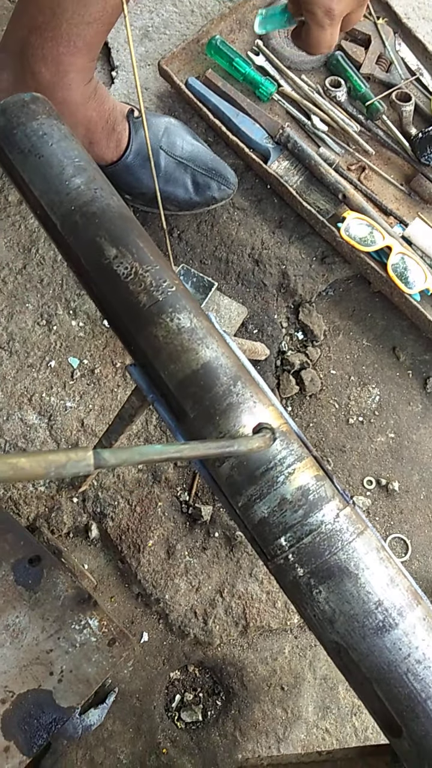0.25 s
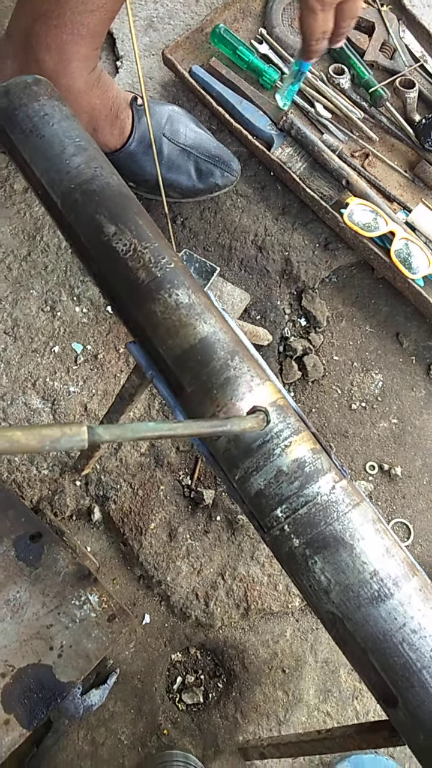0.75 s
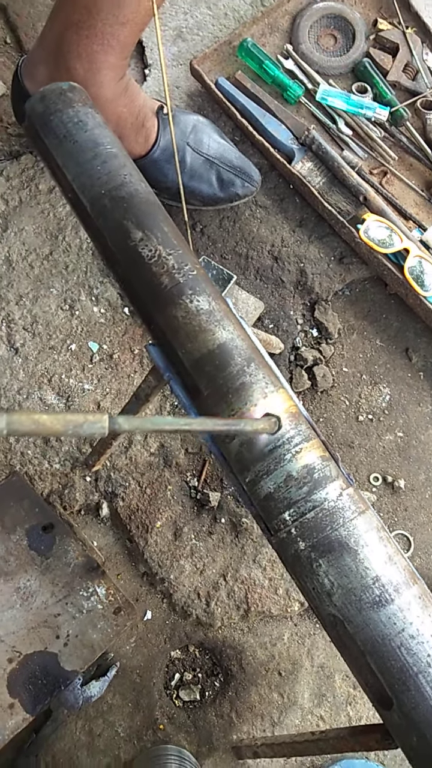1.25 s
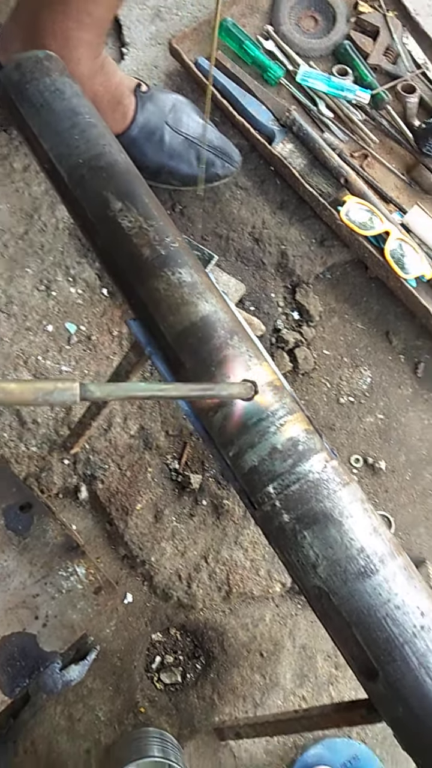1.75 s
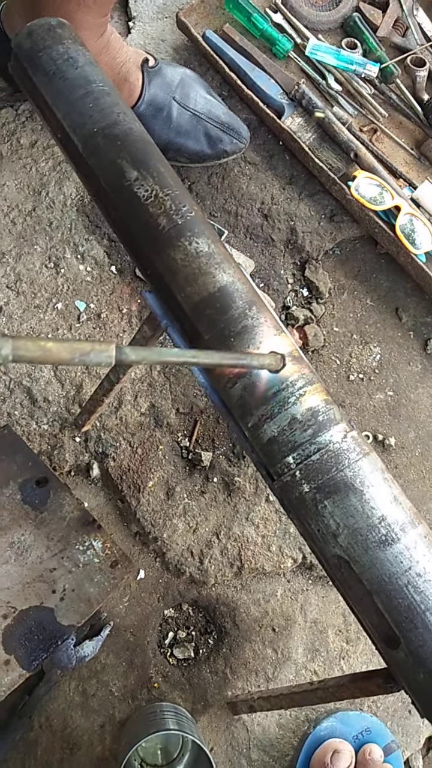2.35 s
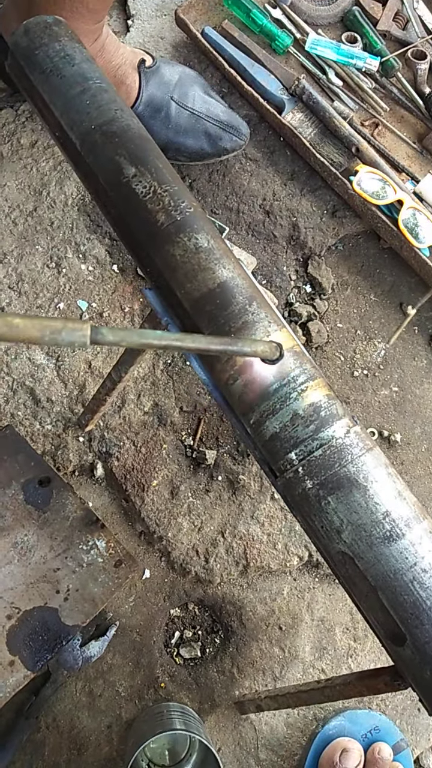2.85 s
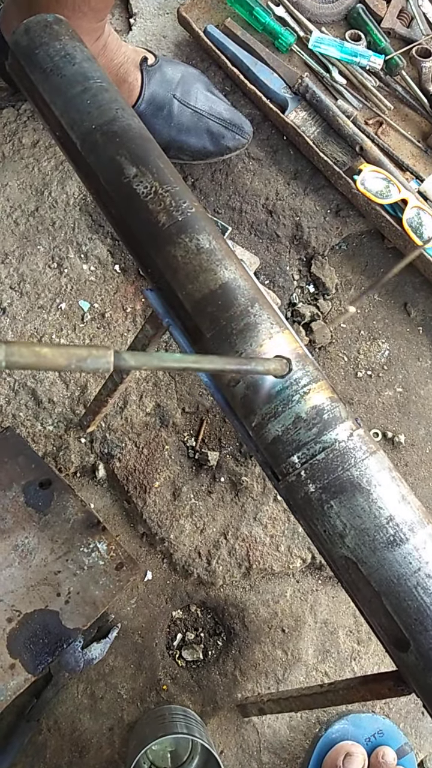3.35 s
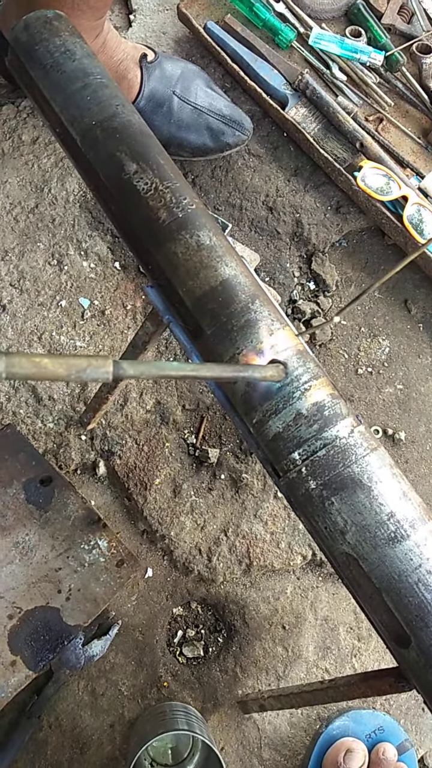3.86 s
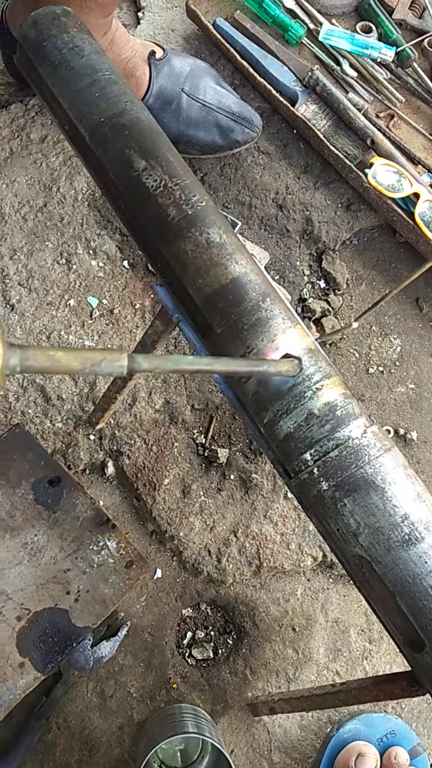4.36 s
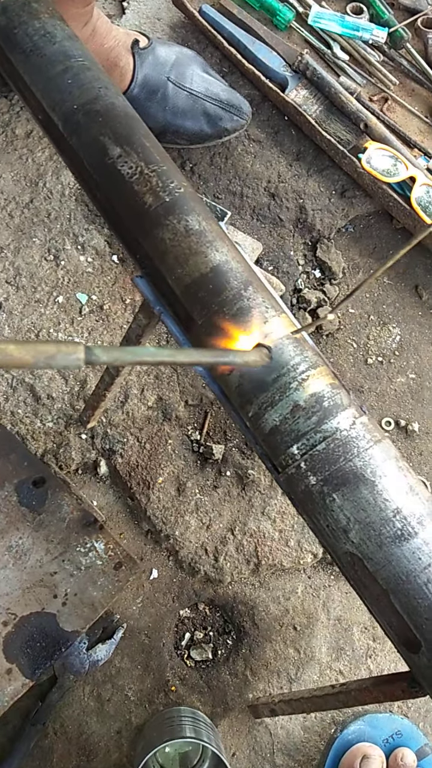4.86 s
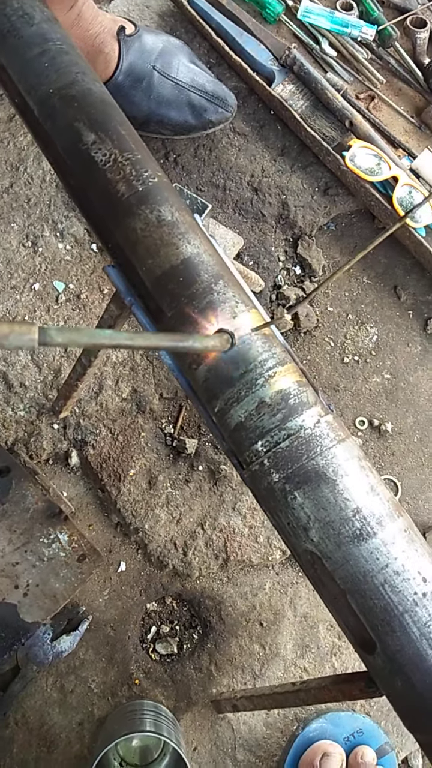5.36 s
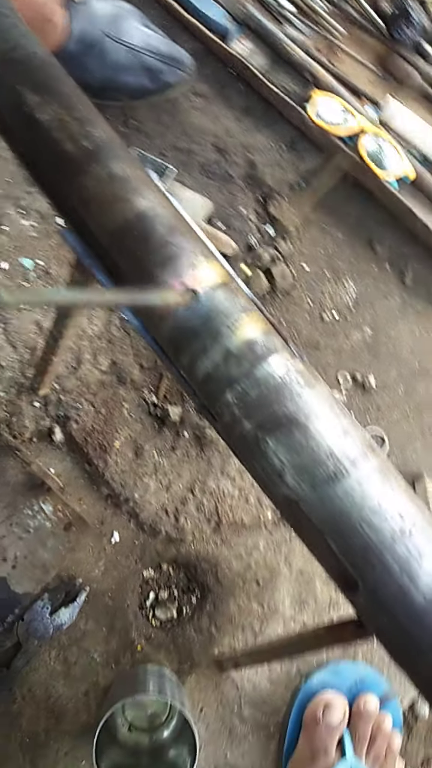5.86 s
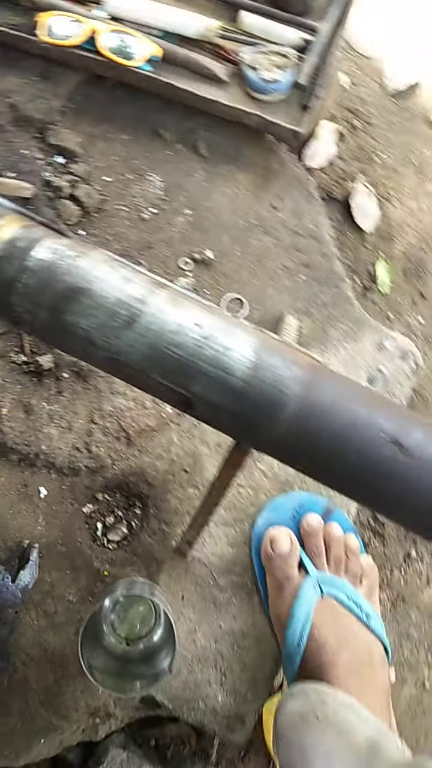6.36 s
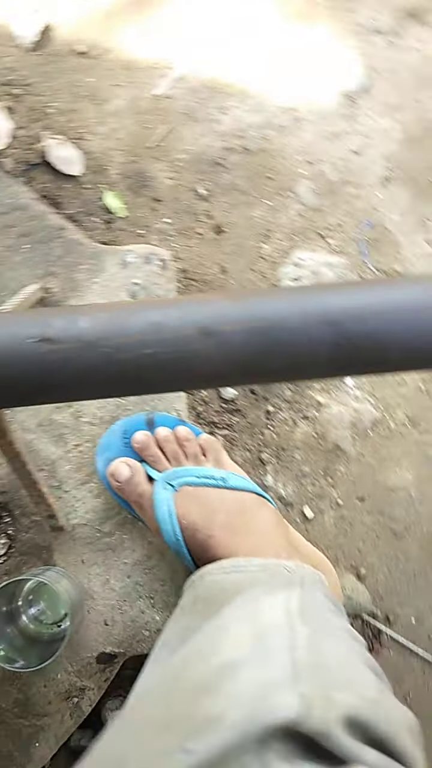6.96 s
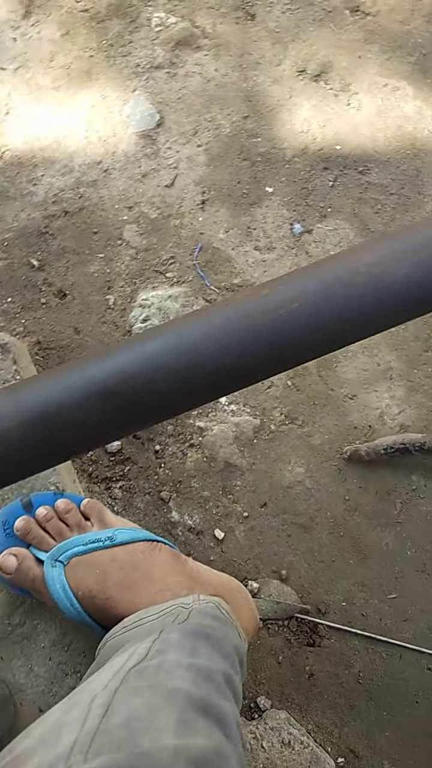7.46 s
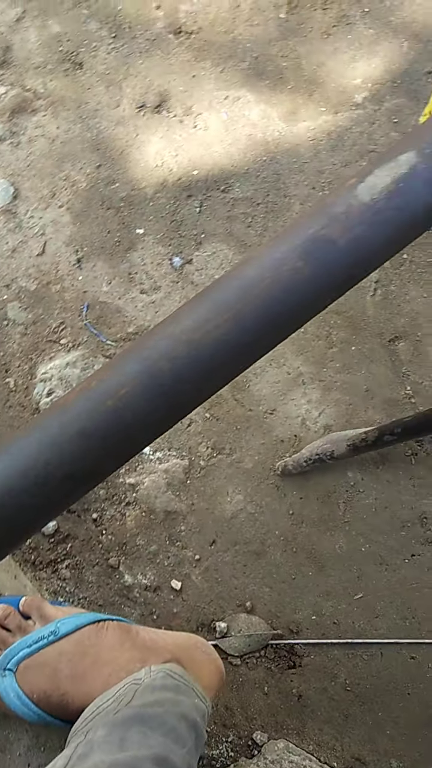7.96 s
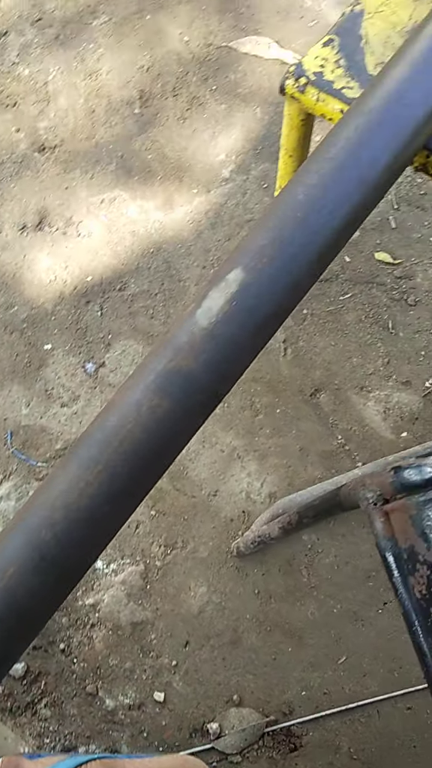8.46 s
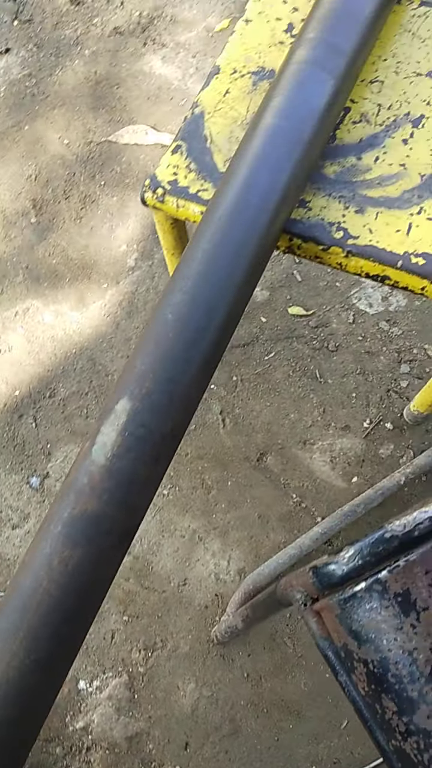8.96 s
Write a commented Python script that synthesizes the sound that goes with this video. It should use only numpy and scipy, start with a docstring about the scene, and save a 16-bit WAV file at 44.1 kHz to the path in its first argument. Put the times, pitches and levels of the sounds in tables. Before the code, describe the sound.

Close, bright welding flame hiss over a low hum, broken by brief crackling pops, then changing colour as the listener turns away.

```python
"""A gas welding torch plays on a steel pipe, about an arm's length from a phone that later turns away.
Turbulent combustion makes the flame rumble, hum and at first flutter in puffs; it roars on the steel.
The jet is shaped noise: a nozzle hiss, a fine sizzle and a thin whistle. Molten metal spits in short pulses,
tools knock and tick, and faint tones pass behind.
Delayed copies off pipe, ground and tools comb the treble and slide as torch and phone move."""
import sys
import numpy as np
from scipy import signal
from scipy.fft import rfft, irfft, next_fast_len
from scipy.io import wavfile
from scipy.ndimage import uniform_filter1d

SR = 44100
rng = np.random.default_rng(int(sys.argv[2]) if len(sys.argv) > 2 else 0)


def waveform_to_disk(signal):
    """Save audio, clipped to [-1, 1], as 16-bit WAV at the path in sys.argv[1]."""
    frames = np.transpose(np.atleast_2d(signal))
    scaled = np.clip(frames, -1, 1) * 32767
    samples = np.round(scaled).astype(np.int16)
    wavfile.write(sys.argv[1], SR, samples)


N = 406161
T = np.arange(N) / SR  # time, s

# Levels in the tables are nominal: the functions add small offsets and chance.
# flame as torch and phone move: t/s, rumble level/dB, roar on steel level/dB, rush round pipe level/dB
FLAME_LEVELS = [(0.0, -24, -34.5, -27.5), (0.23, -30, -31, -27.0), (0.49, -30, -31.5, -28.5),
                (0.86, -30.5, -32.5, -27.5), (1.57, -33, -31.5, -29.0), (1.78, -34, -31, -27),
                (2.5, -34.5, -35, -29.5), (2.78, -37.5, -32.5, -28.5), (3.44, -33, -33.5, -29.0),
                (3.67, -39, -39.5, -38), (4.4, -39.5, -40, -36.5), (4.77, -42.0, -43.5, -41),
                (5.6, -45.5, -44.0, -39), (6.35, -42.5, -43, -38), (6.91, -36.5, -33.0, -30.5),
                (7.48, -34.5, -32.5, -36), (8.1, -32.5, -31.5, -36.0), (8.43, -37.5, -34.5, -37.5),
                (8.9, -37, -30.0, -31.5), (9.21, -41, -32.5, -32.5)]
# gas jet: t/s, nozzle hiss level/dB, fine sizzle level/dB
JET_LEVELS = [(0, -32, -43), (.51, -37, -40.5), (.68, -33, -38), (1.12, -33, -31), (1.36, -30, -38.5),
              (1.58, -41.5, -37), (1.79, -32, -43), (1.95, -37.5, -42.5), (2.44, -35, -39.5),
              (2.85, -37.5, -42.5), (3.05, -34.5, -41.5), (3.51, -37, -43.5), (4.28, -36.5, -43.5),
              (4.6, -36.5, -42), (5.67, -40, -44.5), (6.32, -36, -47), (6.89, -37.5, -45.5),
              (7.28, -33.5, -39), (8.23, -33, -38.5), (8.52, -35.5, -39.5), (8.98, -28, -35.5),
              (9.21, -31.5, -40)]
# relative noise spectra of flame and jet: f/Hz, level/dB per Hz
RUMBLE_SPECTRUM = [(13, -55), (22, -27), (38, -21.5), (99, 0.5), (124, -1.5), (185, -4), (237, -3),
                   (275, -7.5), (335, -8.5), (375, -20), (430, -17.5), (560, -31), (950, -120)]
ROAR_SPECTRUM = [(220, -34), (380, -9), (503, -3.5), (734, 1), (860, -2.5), (1100, -2), (1500, -0.5),
                 (1620, -3.5), (1910, -1.5), (2070, -4), (2360, -2), (2580, -6.5), (3100, -5), (4030, -25),
                 (6820, -120)]
RUSH_SPECTRUM = [(1530, -19), (2600, -6), (3380, 0.5), (4700, -1.5), (5390, -14), (5700, -11.5),
                 (7410, -17), (12500, -120)]
HISS_SPECTRUM = [(3120, -13.5), (5300, -3.5), (7120, 0), (7610, -2.5), (8810, -9.5), (9400, -14.5),
                 (12200, -41), (20700, -120)]
SIZZLE_SPECTRUM = [(5240, -20), (8900, -13), (9710, -6.5), (10900, -3), (13500, -2.5), (14600, 0.5)]
# echo paths: t/s, lag off the ground/ms, lag off the pipe/ms, turn away from the work (0-1)
ECHO_PATHS = [(0, 2.1, 0.32, 0.2), (.8, 1.97, 0.28, 0), (1.6, 2.03, 0.28, 0), (2.1, 1.96, 0.28, 0.14),
              (3.2, 2.27, .27, 0), (3.8, 1.95, 0.26, 0.23), (4.4, 2.1, 0.27, 0.06), (5.3, 2.11, 0.21, 0),
              (5.9, 2.24, 0.22, 0.45), (6.5, 1.82, 0.295, 0.8), (7.2, 1.44, 0.3, 1), (8.2, 1.53, 0.36, 1),
              (8.8, 1.01, 0.34, 0.8), (9.21, 0.96, 0.34, 0.63)]
# hollows that ring with the flame as the phone turns: f/Hz, width/Hz, level/dB re roar
HOLLOW_MODES = [(167, 28, -12), (234, 31, -4), (336, 60, -8.5), (728, 57, -14.5), (883, 58, -11),
                (1720, 42, -11.5), (2575, 60, -18)]
# low hum of the flame: f/Hz, width/Hz, level/dB re rumble
HUM_MODES = [(114.4, 9.6, -8), (135.7, 1.8, -6.5), (272.5, 5.1, -18.5)]
# partials of a puff: multiple of its pitch, rise time/s, level/dB
PUFF_PARTIALS = [(1, 0.012, 0.5), (2.2, .007, -4.5), (1.65, 0.007, -28)]
# loud spits of the melt: t/s, peak level/dB
LOUD_POPS = [(3.9727, -11), (3.9878, -11), (3.9936, -5), (4.0576, -10), (4.0669, -9.5), (4.5011, -15),
             (4.9385, -8), (4.9422, -3.5), (4.9566, -2), (4.96, -6), (4.9662, -4), (4.9795, -5),
             (4.9809, -6), (4.9988, -9), (5.0024, -12), (5.0064, -11), (5.4363, -12), (5.4375, -13),
             (5.4548, -12)]
# small knocks and ticks of tools: t/s, peak level/dB, f/Hz, decay time/s
TOOL_TICKS = [(.727, -13, 3830, 0.0083), (.727, -18, 1080, 0.0087), (.731, -16, 2300, .01),
              (.83, -24, 2000, .012), (6.902, -24, 2970, 0.0043), (6.923, -18, 3180, 0.0079),
              (7.045, -18, 3530, 0.0066), (7.045, -27, 12000, .005), (7.985, -23, 2000, .004),
              (8.090, -18, 2600, 0.011)]
# bright bands: t/s, lower f/Hz (in the rush), upper f/Hz (in the hiss), prominence level/dB
BRIGHT_BANDS = [(0, 3150, 7260, -1.5), (.7, 3300, 7240, -4.5), (1.3, 3350, 7060, -5), (2.2, 3350, 6780, -7),
                (3.5, 3400, 6730, -13), (4.2, 3700, 7400, -16), (5.3, 3800, 7620, -5.5),
                (6.0, 3450, 7420, -10), (6.25, 3350, 6900, -1.5), (6.6, 3200, 6650, -3),
                (7.0, 3200, 7290, -0.5), (7.6, 3100, 7280, -5), (8.2, 3200, 7610, -5.5),
                (9.21, 3300, 7570, -5)]
# faint passing tones: start t/s, end t/s, f/Hz, rms level/dB
PASSING_TONES = [(4.15, 4.8, 378, -53.5), (5.5, 6.9, 494.5, -57), (5.7, 8.3, 240.1, -50),
                 (6.597, 7.8, 740, -46.5), (7.95, 9.2, 849, -43)]
# thin whistle of the tip: f/Hz, width/Hz, level/dB re the mean of hiss and sizzle
WHISTLE_MODES = [(14800, 500, -9), (15260, 200, -4.5)]
# the flame lifts off the steel: t/s, half length/s, drop of roar level/dB
FLAME_LIFTS = [(1.15, .12, 4.5), (1.53, .06, 1.5), (2.36, 0.072, 3.5), (3.11, 0.062, 5), (3.81, 0.071, 3.5),
               (4.17, 0.17, 4.5), (4.7, .07, 1), (5.09, 0.074, 5), (5.54, .05, 4.3), (6.05, .05, 3.5)]
# the tip dips close to the melt: t/s, half length/s, rise of sizzle level/dB
TIP_DABS = [(1.03, 0.067, 2), (2.07, 0.059, 7.5), (2.25, .045, 10.5), (2.43, 0.095, 9.5), (2.62, 0.065, 6),
            (3.43, 0.054, 9.5), (3.59, 0.12, 8), (4.0, 0.097, 11), (4.47, 0.046, 4.5), (4.96, 0.06, 7),
            (5.24, .05, 0.5), (5.45, 0.064, 6), (5.9, .07, 3.5), (6.66, 0.13, 5.5), (7.86, 0.046, 1)]
# the treble dips briefly: t/s, half length/s, drop of hiss level/dB, drop of sizzle level/dB
TREBLE_DIPS = [(6.13, 0.076, 2.5, 0), (6.495, .03, 6, 0), (6.984, 0.035, 1.5, 8), (7.483, 0.028, 3, 5),
               (7.734, .04, 2, 5)]
# runs of flutter: first puff t/s, last puff t/s, first peak level/dB, last peak level/dB, f/Hz
FLUTTER_RUNS = [(.026, 0.242, -20, -16, 132.4), (.2875, 0.459, -20.5, -20.5, 132),
                (.556, 0.903, -24.5, -24.5, 134.4), (1.725, 1.77, -30, -28, 132),
                (1.983, 2.025, -24, -27, 117), (2.135, 2.175, -25, -23.5, 116)]
# bursts of weaker crackle: start t/s, end t/s, typical peak level/dB
CRACKLE_BURSTS = [(3.957, 4.002, -23), (4.059, 4.1, -23.5), (4.468, 4.51, -27), (4.944, 4.97, -12),
                  (4.976, 4.985, -16), (4.996, 5.003, -17), (5.422, 5.467, -21)]
# scattered paths shorten as the phone swings away: t/s, share of first length
PATH_SHRINK = [(5.9, 1), (6.4, 0.83), (7.4, 0.76), (9.21, .6)]
# a second bright band glides up through the hiss as the phone turns: t/s, f/Hz, prominence level/dB
GLIDING_BAND = [(7.3, 5450, -30), (7.8, 5650, -11), (8.3, 5970, -5), (8.7, 6450, -8), (9.21, 7020, -14)]

LIFT_RUMBLE, LIFT_RUSH, LIFT_HISS, LIFT_SIZZLE = 0.23, 1.0, .8, 0.72  # dB lost per dB of roar
DAB_HISS = 0.59  # dB of hiss per dB of sizzle
PUFF_PERIOD_S, PUFF_SCATTER_DB = .0435, 0.3
CRACKLE_GAP_S, CRACKLE_SCATTER_DB = .004, 2
TONE_FADE_S, TONE_WAVER = 0.16, .008  # waver as a share of the pitch
TOP_HZ = 15600


def undb(db):
    """Amplitude ratio from its logarithmic level in decibels."""
    return 10 ** (np.asarray(db) / 20)


def unit(x):
    """Normalisation to unit root-mean-square amplitude."""
    return x / np.sqrt(np.mean(x ** 2))


def curves(table):
    """Linear interpolation in time of each table column."""
    s, *columns = np.transpose(table)
    return [np.interp(T, s, c) for c in columns]


def swells(rows):
    """Superposition of Gaussian bells (s, half length s, height)."""
    return sum(height * np.exp(-((T - s) / half) ** 2) for s, half, height in rows)


def walk(rate):
    """Slow random modulation: levels held 1 / rate s and slewed, rms 1."""
    k = max(int(SR / rate), 1)
    levels = rng.standard_normal(N // k + 1)
    return unit(uniform_filter1d(np.repeat(levels, k), k)[:N])


def noise(gain_at):
    """Spectral shaping of white noise by a gain of frequency, rms 1."""
    size = next_fast_len(N, True)
    hz = np.maximum(np.fft.rfftfreq(size, 1 / SR), 1)
    return unit(irfft(rfft(rng.standard_normal(size)) * gain_at(hz), size)[:N])


def turbulence(colour):
    """Broadband turbulence noise, its spectrum interpolated on log frequency."""
    points, db = np.transpose(sorted(map(tuple, colour)))
    return noise(lambda hz: undb(np.interp(np.log(hz), np.log(points), db, left=-90, right=-90)))


def resonances(modes):
    """Resonance under random excitation: noise peaks (Hz, width Hz, dB), summed."""
    def peak(centre, width):
        return noise(lambda hz: 1 / (1 + ((hz - centre) / width) ** 2))
    return sum(undb(db) * peak(centre, width) for centre, width, db in modes)


def band(hz, width):
    """Amplitude and phase modulation: low noise moved onto a gliding carrier."""
    envelope = noise(lambda f: 1 / (1 + (f / width) ** 2) * (f < 4 * width))
    phase = 2 * np.pi * np.cumsum(hz) / SR + 2 * walk(width)
    return np.sqrt(2) * envelope * np.cos(phase)


def butter(x, hz, kind, order=2):
    """Causal Butterworth filtering, low-, high- or band-pass."""
    return signal.sosfilt(signal.butter(order, np.minimum(hz, .45 * SR), kind, fs=SR, output="sos"), x)


def delayed(x, lag_ms):
    """Propagation delay along a path of changing length."""
    fine = signal.resample_poly(x, 2, 1)
    return np.interp(T - lag_ms / 10 ** 3, np.arange(2 * N) / (2 * SR), fine)


def add(track, s, sound):
    """Linear superposition of a sound at a given time."""
    i = max(int(s * SR), 0)
    track[i:i + len(sound)] += sound[:N - i]


def flame():
    """Combustion noise: gas rumbles and hums; shared eddies shake the roar on the steel and the rush round it."""
    rumble_db, roar_db, rush_db = curves(FLAME_LEVELS)
    lift_db = swells(FLAME_LIFTS)
    rumble_db = rumble_db - LIFT_RUMBLE * lift_db
    roar_db = roar_db - lift_db
    rush_db = rush_db - LIFT_RUSH * lift_db
    turn = curves(ECHO_PATHS)[2]
    bright_hz, _, bright_db = curves(BRIGHT_BANDS)
    eddies = walk(60)
    # while the flame flutters, the puffs carry most of its low sound
    rumble_db = rumble_db - np.interp(T, [.45, .6, 1.1], [5, 1.8, 0])
    rumble = turbulence(RUMBLE_SPECTRUM) + (1 - 0.76 * turn) * resonances(HUM_MODES)
    low = rumble * undb(rumble_db - 1.1 + 1.0 * turn + 1.2 * walk(18))
    low = low + turn * undb(roar_db - 1.0) * resonances(HOLLOW_MODES)
    roar_db = roar_db + 0.12 - 1.3 * turn + 0.76 * eddies + 0.97 * walk(300)
    roar = turbulence(ROAR_SPECTRUM) * undb(roar_db)
    rush = turbulence(RUSH_SPECTRUM) + undb(bright_db - 3.5) * band(bright_hz, 200)
    rush = rush / np.sqrt(1 + undb(2 * bright_db - 1.5))
    return low, roar + rush * undb(rush_db - 0.06 + 0.46 * eddies + 0.9 * walk(18))


def jet():
    """Jet noise: the nozzle hisses and whistles; the sizzle flickers as the tip wavers over the melt."""
    hiss_db, sizzle_db = curves(JET_LEVELS)
    lift_db, dab_db, waver = swells(FLAME_LIFTS), swells(TIP_DABS), walk(14)
    hiss_dip_db = swells((s, half, db) for s, half, db, _ in TREBLE_DIPS)
    sizzle_dip_db = swells((s, half, db) for s, half, _, db in TREBLE_DIPS)
    hiss_db = hiss_db - LIFT_HISS * lift_db + DAB_HISS * dab_db + 0.95 * waver - hiss_dip_db
    sizzle_db = sizzle_db - LIFT_SIZZLE * lift_db + dab_db + 1.2 * waver - sizzle_dip_db
    _, bright_hz, bright_db = curves(BRIGHT_BANDS)
    glide_hz, glide_db = curves(GLIDING_BAND)
    hiss = turbulence(HISS_SPECTRUM) + undb(bright_db) * band(bright_hz, 280)
    hiss = hiss + undb(glide_db) * band(glide_hz, 170)
    # the bands change the colour, not the power
    hiss = hiss / np.sqrt(1 + undb(2 * bright_db) + undb(2 * glide_db))
    hiss = hiss * undb(hiss_db + 0.16 + 0.57 * walk(35))
    sizzle = turbulence(SIZZLE_SPECTRUM) * undb(sizzle_db - 0.4 + 1.24 * walk(35) + 0.78 * walk(150))
    whistle = resonances(WHISTLE_MODES) * undb((hiss_db + sizzle_db) / 2 + 2 * walk(25))
    return hiss + sizzle + whistle


def scatter(x, count=6):
    """Scattering of short waves by tools and legs: weak echoes whose paths shorten as the phone swings away."""
    turn = curves(ECHO_PATHS)[2]
    share = .15 + .1 * turn
    shrink, = curves(PATH_SHRINK)
    echoes = np.zeros(N)
    for k, lag_ms in enumerate(np.geomspace(.62, 3.1, count)):
        echoes += (-1) ** k * delayed(x, lag_ms * shrink + 0.038 * walk(4.4))
    return (x + share * echoes) / np.sqrt(1 + count * share ** 2)


def reflections(x, ground=0.12, pipe=0.13, turned=0.013):
    """Comb interference: two short echoes grow as the phone turns and tremble with the hand."""
    ground_ms, pipe_ms, turn = curves(ECHO_PATHS)
    a, b = ground + turned * turn, pipe + turned * turn
    ground_echo = delayed(x, ground_ms + 0.03 * walk(4.2))
    pipe_echo = delayed(x, pipe_ms + 0.0041 * walk(3.5))
    return (x + a * ground_echo + b * pipe_echo) / np.sqrt(1 + a ** 2 + b ** 2)


def flutter():
    """Periodic flame instability: evenly spaced puffs each swell and ring for a few low cycles."""
    out, t = np.zeros(N), np.arange(SR // 10) / SR
    for first, last, first_db, last_db, hz in FLUTTER_RUNS:
        count = round((last - first) / PUFF_PERIOD_S) + 1
        for s, db in np.linspace((first, first_db), (last, last_db), count):
            db = db + PUFF_SCATTER_DB * rng.standard_normal()
            for multiple, rise, mode_db in PUFF_PARTIALS:
                swell = (t / rise * np.exp(1 - t / rise)) ** 2
                pitch = hz * multiple * (1 + 0.01 * rng.standard_normal())
                add(out, s, undb(db + mode_db) * swell * np.sin(2 * np.pi * pitch * t))
    return out


def ticks():
    """Impact of small hard bodies: band-passed noise with exponential decay."""
    out, t = np.zeros(N), np.arange(SR // 12) / SR
    for (s, db, hz, decay), chance in zip(TOOL_TICKS, rng.standard_normal((len(TOOL_TICKS), len(t)))):
        burst = butter(chance, [hz / 1.4, hz * 1.11], "band") * np.exp(-t / decay)
        add(out, s, undb(db) * burst / np.abs(burst).max())
    return out


def crackle():
    """Random point process: weak pops at uneven gaps through each burst, as (s, peak dB)."""
    spits = []
    for start, end, db in CRACKLE_BURSTS:
        for s in np.arange(start, end - CRACKLE_GAP_S / 2, CRACKLE_GAP_S):
            late = CRACKLE_GAP_S * rng.random()
            spits.append((s + late, db + CRACKLE_SCATTER_DB * rng.standard_normal()))
    return spits


def pops(decay_s=0.00069, fizz=0.23, flare_db=-12, flare_s=0.019):
    """Impulsive radiation from the melt: a steep, short pressure step, a fizz of sparks and a flare of the flame."""
    out, t = np.zeros(N), np.arange(SR // 40) / SR
    spits = list(LOUD_POPS) + crackle()
    for (s, db), chance in zip(spits, rng.standard_normal((len(spits), len(t)))):
        # chance also sets the sign and decay of the step
        step = np.sign(chance[0]) * np.exp(-t / (decay_s * np.exp(0.13 * chance[1])))
        add(out, s, undb(db) * (step + fizz * chance * np.exp(-t / 0.0029)))
    # the flare follows the smoothed energy of the pops
    energy = uniform_filter1d(out ** 2, int(flare_s * SR))
    energy = uniform_filter1d(energy, int(flare_s * SR))
    ringing = resonances([(220, 62, -2), (574, 48, -5), (1800, 1800, -0.5)])
    flare = undb(flare_db) * np.sqrt(np.abs(energy)) * ringing
    return butter(butter(out, 4500, "low", order=3), 87, "high") + flare


def faint_tones():
    """Frequency-modulated sinusoids: weak, wavering tones swell and fade behind the flame."""
    out = np.zeros(N)
    for start, end, hz, db in PASSING_TONES:
        swell = np.clip(np.minimum(T - start, end - T) / TONE_FADE_S, 0, 1)
        level = np.sqrt(2) * swell * undb(db + 2.3 * walk(12))
        phase = 2 * np.pi * np.cumsum(hz * (1 + TONE_WAVER * walk(25))) / SR
        out += level * np.sin(phase)
    return out


def scene():
    """Superposition at one microphone, the same in both ears."""
    low, roar = flame()
    treble = reflections(roar + scatter(jet()))
    sound = low + treble + flutter() + ticks() + pops() + faint_tones()
    return np.array([sound, sound])


def record(dry):
    """Saturation and band limiting: the phone rounds the loudest peaks and cuts the top."""
    rounded = .8 * np.tanh(dry / .8)
    return signal.sosfilt(signal.ellip(12, .2, 80, TOP_HZ, fs=SR, output="sos"), rounded)


dry = scene()
out = record(dry)
waveform_to_disk(out)
```